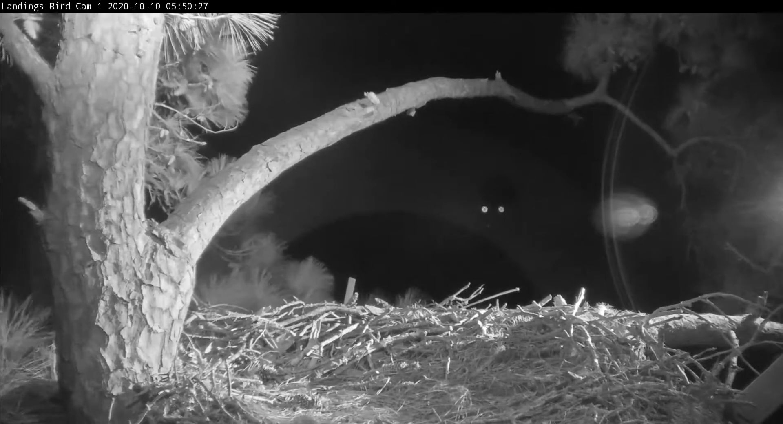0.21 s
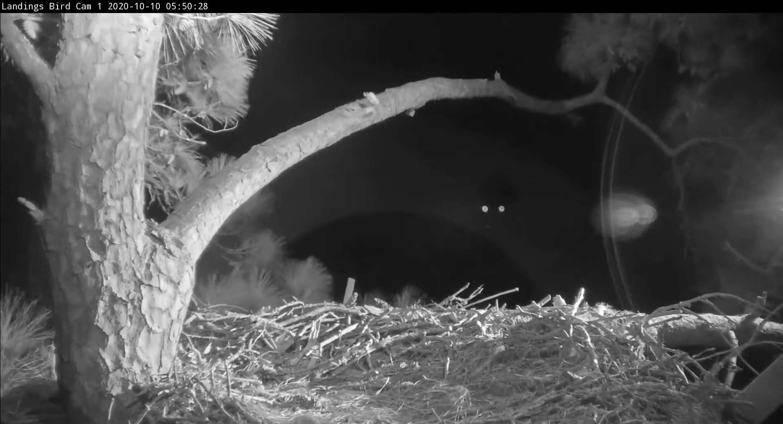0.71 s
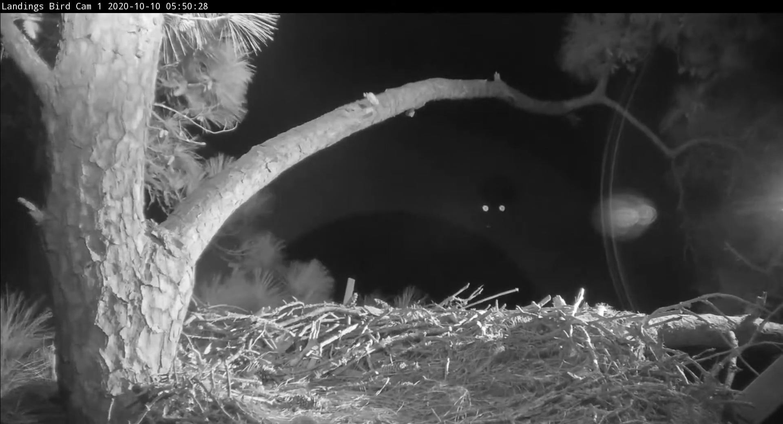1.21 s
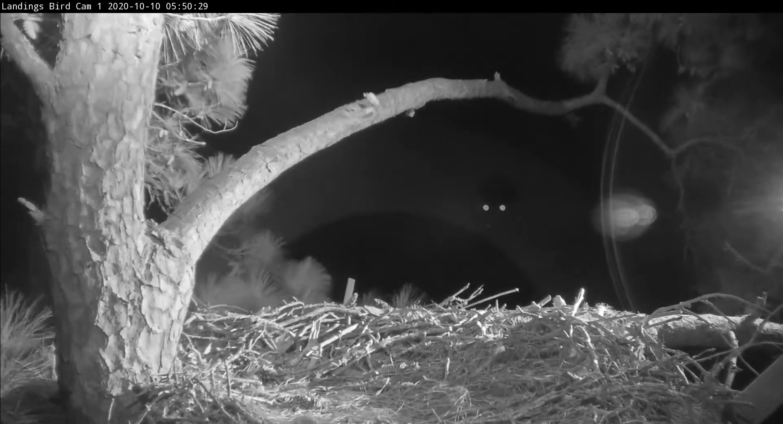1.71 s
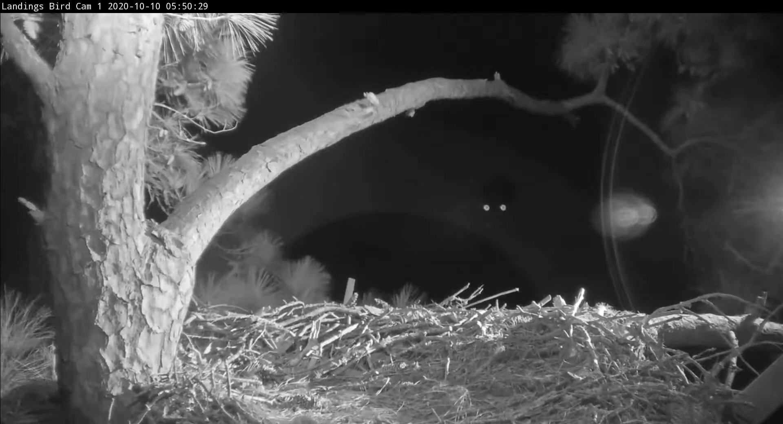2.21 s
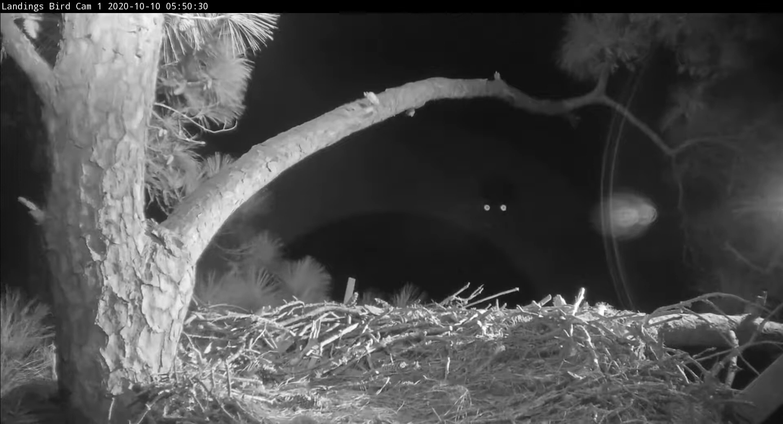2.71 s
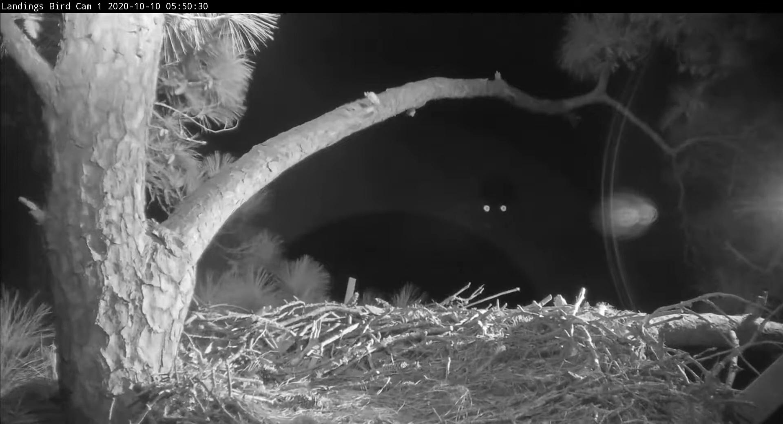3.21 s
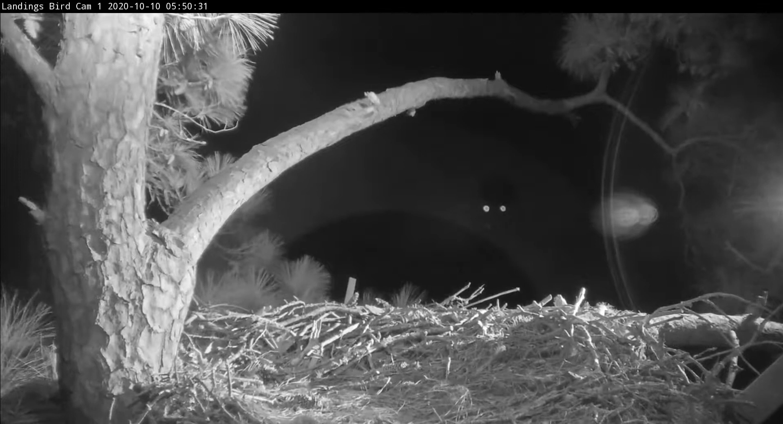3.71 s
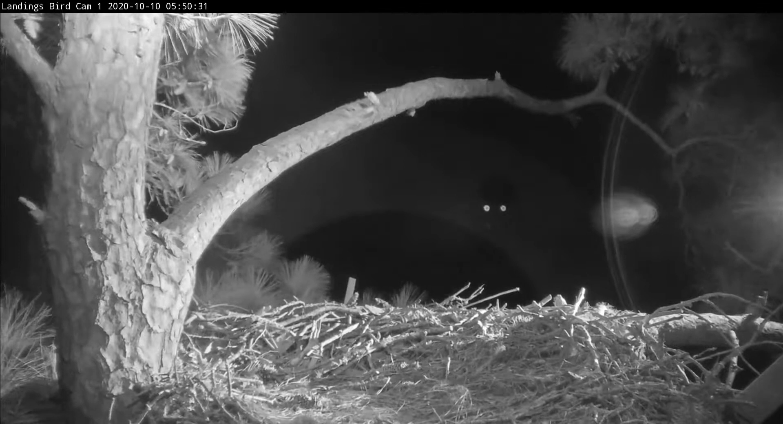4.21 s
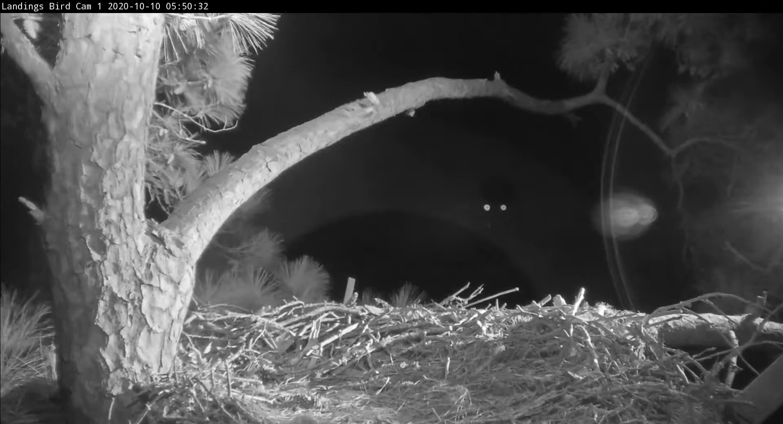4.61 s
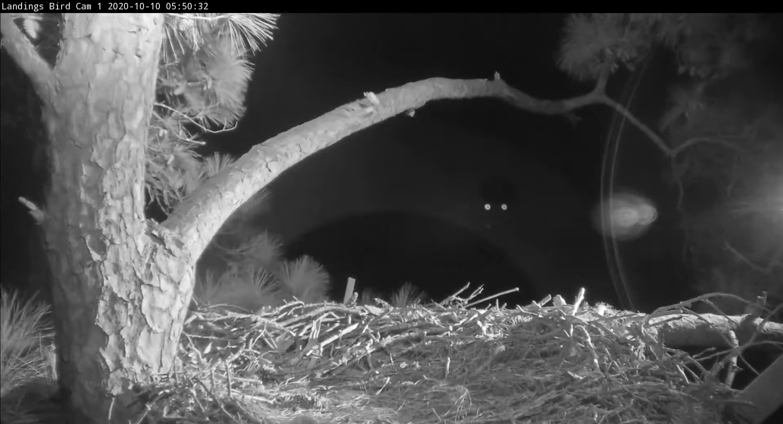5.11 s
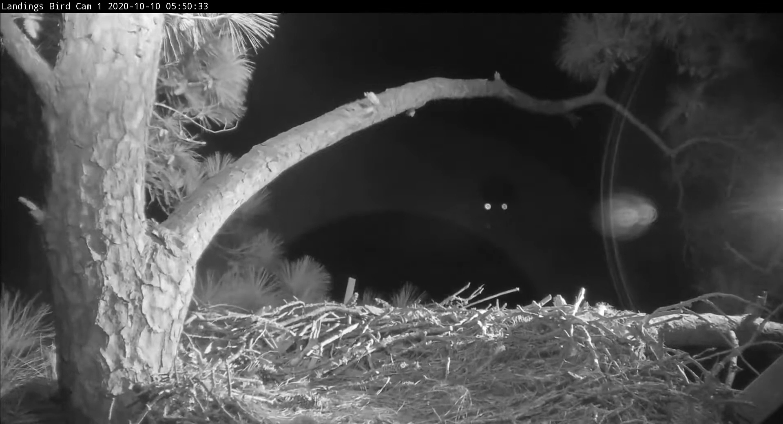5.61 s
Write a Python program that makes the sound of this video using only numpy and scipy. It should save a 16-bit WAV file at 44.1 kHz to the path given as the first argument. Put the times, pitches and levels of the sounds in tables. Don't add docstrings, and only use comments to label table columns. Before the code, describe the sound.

Crickets trill without pause over rumbling gusts and faint hum; an owl yelps at the very start and calls again, softly, five seconds later.

```python
import sys
import numpy as np
from scipy import signal
from scipy.fft import rfft, irfft, next_fast_len
from scipy.io import wavfile
from scipy.ndimage import uniform_filter1d

SR = 44100
rng = np.random.default_rng(int(sys.argv[2]) if len(sys.argv) > 2 else 0)


def to_wav(sig):
    pcm = np.clip(np.atleast_2d(sig), -1, 1) * 32767
    pcm = np.round(pcm).astype(np.int16)
    wavfile.write(sys.argv[1], SR, pcm.T)


def gain_from_decibels(decibels):
    exponent = np.asarray(decibels, float) / 20
    return 10 ** exponent


N = 257544

SQUAWK = [
    (0, 866, -22, .15, -3),
    (.003, 866, -29, .2, -2),
    (.005, 864, -26, .2, -1),
    (.009, 862, -32.5, .35, 0),
    (.014, 850, -36, .6, 1),
    (.019, 835, -35, .6, -1),
    (.023, 820, -55, .7, 0),
]
YELP = [
    (.016, 790, -40, .4, -2),
    (.022, 790, -29, .15, -3),
    (.026, 793, -18, .08, -5),
    (.032, 762, -22.5, .15, -6),
    (.036, 730, -28, .3, -6),
    (.040, 700, -24, .25, -8),
    (.046, 615, -31, .6, -12),
    (.060, 560, -35, .8, -17),
    (.085, 500, -50, .85, -18),
]
RISING_NOTE = [
    (4.965, 341.7, -61, 0.3, 7),
    (5.0, 406.4, -41.5, 0.17, -3),
    (5.025, 444.7, -46.5, 0.12, -2.5),
    (5.062, 463.4, -43.5, 0.01, -1),
    (5.12, 445.4, -49, 0.06, 1),
    (5.172, 448.3, -47.5, 0.03, 0.5),
    (5.215, 466, -43.5, 0.06, 1.5),
    (5.232, 496, -41.5, 0.03, -7),
    (5.242, 523, -84, 0.3, -7),
]
WHISTLE = [
    (5.222, 2597, -63, 0.79, 9),
    (5.233, 2640, -60, .8, 10),
    (5.247, 2690, -46.5, 0.1, 5),
    (5.27, 2605, -43, 0.6, -2.5),
    (5.287, 2600, -45.5, 0.49, 1.5),
    (5.305, 2500, -45.5, 0.58, 1.5),
    (5.333, 2480, -49, 0.55, 3),
    (5.352, 2440, -49.5, 0.89, 2),
    (5.39, 2400, -59, 0.97, -5),
]
CLOSING_NOTE = [
    (5.345, 385, -84, 0.23, -2),
    (5.364, 396, -61, .3, -4),
    (5.378, 387, -49, 0.12, -5.5),
    (5.393, 365, -66, .2, -6),
    (5.415, 370, -71, .3, -9),
]
PUFF = [
    (5.45, 648, -78, .7, -11),
    (5.47, 630, -42, 0.56, -16),
    (5.49, 660, -55, 0.54, -12),
    (5.51, 640, -69, .7, -6),
]
# [t/s, peak level/dB, f/Hz]
BEAK_CLACK = [
    (5.33, -47, 3400),
    (5.331, -52, 4600),
    (5.33, -53, 6000),
    (5.345, -48, 4850),
]
THIN_TONE = [
    (0.09, -48, 1310),
    (0.125, -49, 1320),
]

# [f/Hz, width/Hz, level/dB]
WINDPIPE = [(440, 60, 1), (915, 550, -9.5), (1330, 350, 2.5), (1760, 140, -12), (2245, 110, -8),
            (3150, 280, -2.5), (3994, 120, -2), (4470, 590, -15), (5340, 300, -14.5)]
WHISTLE_BEAK = [(1300, 1300, -7), (2620, 450, -1), (3300, 450, 4.5), (3740, 260, 4), (4270, 300, 3),
                (4700, 350, -2), (5250, 500, -3)]
OPEN_BEAK = [(860, 300, -12), (1780, 350, -14), (2590, 400, 2), (3480, 350, -4.5), (4250, 500, -16),
             (5130, 400, -9), (5900, 400, -21)]
YELP_BEAK = [(546, 290, -16.5), (1146, 250, -5), (1865, 240, 0), (2410, 620, -1.5), (2990, 450, 3),
             (4160, 480, -7), (4910, 500, -8.5), (5800, 800, -18)]
SHUT_BEAK = [(387, 270, -2), (780, 270, -8), (1180, 250, 7), (1600, 400, 0)]

# [t/s, level/dB]
CHORUS_SWELLS = [(0.08, -45.5), (0.37, -47), (1.43, -47), (2.12, -42.5), (2.21, -47.5), (2.39, -42.5),
                 (2.68, -45), (2.76, -41), (2.92, -43.5), (3.29, -41), (3.42, -44), (4.75, -43), (5.4, -47),
                 (5.57, -42.5), (5.6, -51.5), (5.65, -44.5), (5.74, -41), (5.84, -44.5)]
# [t/s, peak level/dB, f/Hz]
NEAR_STROKES = [(0.101, -36, 2950), (0.406, -35.5, 2960), (0.584, -33, 2960), (0.681, -35, 2890),
                (1.032, -32, 2940), (1.075, -33.5, 2990), (1.153, -35, 2890), (1.378, -35.5, 2970),
                (1.52, -36.5, 2980), (1.847, -37, 2970), (1.89, -36, 2910), (1.935, -34.5, 2900),
                (1.973, -34.5, 2950), (2.051, -32.5, 2990), (2.125, -31, 2930), (2.408, -35.5, 2860),
                (2.438, -34.5, 2910), (2.683, -36, 3030), (2.777, -34.5, 2960), (2.835, -33.5, 2950),
                (2.881, -38, 2860), (2.924, -37.5, 2970), (2.963, -34.5, 2980), (2.996, -34, 3020),
                (3.118, -33.5, 2880), (3.166, -32, 2990), (3.228, -43, 2960), (3.259, -30.5, 2930),
                (3.29, -33.5, 2890), (3.357, -33, 2940), (3.482, -33, 2940), (3.513, -34.5, 2910),
                (3.609, -34.5, 2980), (3.66, -33.5, 2920), (3.883, -38.5, 3030), (3.943, -35.5, 3020),
                (3.994, -33, 2960), (4.063, -35, 3060), (4.094, -33.5, 2870), (4.143, -35.5, 2960),
                (4.183, -35.5, 2990), (4.248, -33, 2950), (4.309, -34.5, 2900), (4.379, -34.5, 2930),
                (4.462, -33, 2890), (4.53, -33.5, 3020), (4.62, -31.5, 2940), (4.681, -36, 3050),
                (4.736, -32, 2930), (4.8, -31, 2970), (4.832, -34, 2990), (4.883, -32, 2940),
                (4.95, -35, 2870), (5.05, -43, 2900), (5.124, -34, 2920), (5.223, -32.5, 2940),
                (5.477, -36.5, 2990), (5.657, -35, 2950), (5.759, -32.5, 3000), (5.79, -36, 2940)]
# [onset t/s, peak level/dB, f/Hz]
MORE_STROKES = [(0.2692, -35, 2990), (0.3376, -35.5, 2840), (0.3865, -35, 2940), (0.5077, -36.5, 2890),
                (0.6225, -39.5, 2950), (0.8086, -35.5, 2920), (0.856, -34.5, 2920), (0.8889, -35, 2930),
                (0.9742, -38, 2910), (1.1104, -34.5, 2910), (1.2231, -38, 2910), (1.2447, -34, 2890),
                (1.275, -33, 2930), (1.3119, -36, 2990), (1.3324, -41, 2970), (1.4551, -37, 2880),
                (1.5384, -37.5, 3060), (1.5702, -37, 3050), (1.5851, -34.5, 2980), (1.729, -37, 2980),
                (1.9574, -34, 2910), (2.0228, -37, 3000), (2.1031, -36, 2840), (2.1983, -36, 2930),
                (2.2633, -35.5, 2940), (2.3476, -39, 2960), (2.3625, -34, 2900), (2.592, -38.5, 2970),
                (2.6339, -36, 2880), (2.7026, -35, 2980), (2.7384, -33, 2990), (3.306, -32, 2990),
                (3.334, -32, 2840), (3.39, -39, 3080), (3.45, -34, 2950), (3.5359, -38, 2900),
                (3.5644, -37, 3040), (3.5848, -33.5, 2910), (3.7738, -36, 2890), (3.9599, -35, 2930),
                (4.28, -37, 2860), (4.334, -40, 2890), (4.354, -36, 3030), (4.4044, -34, 2930),
                (4.432, -32.5, 2910), (4.575, -39, 2980), (4.6374, -33, 2950), (4.706, -33, 2970),
                (4.757, -32.5, 2930), (4.8604, -34, 2940), (4.9172, -34, 3010), (5.0305, -40, 2880),
                (5.406, -35.5, 3060), (5.4331, -33.5, 2940), (5.5333, -33.5, 2920), (5.6341, -33.5, 2980),
                (5.6915, -34, 2850), (5.723, -34, 2960), (5.8262, -37, 2950)]

# [f/Hz, level/(dB per Hz)]
AIR = [(60, -26), (150, 0), (400, -6.5), (680, -12.5), (1000, -5.5), (1190, 2.5), (1420, -2), (1900, -4),
       (2500, -9), (3400, -4.5), (4300, -10), (5200, -17.5), (6000, -10), (6700, -10.5), (7200, -28.5)]
# [t/s, gain/dB]
GAIN = [(0, -3), (0.5, -4), (1.0, -5), (1.45, -3), (2.05, 0.5), (2.25, -3), (2.6, -1), (3.2, 0), (3.9, 1),
        (4.3, -1), (4.9, 1), (5.1, -3), (5.55, -1.5), (5.84, 1.5)]

# [t/s, level/dB]
GUSTS = [(0.0, -35.5), (0.4, -38.5), (0.6, -36.5), (0.78, -30.5), (1.0, -39.5), (1.36, -33), (1.42, -51),
         (1.7, -44), (1.85, -46), (2.1, -48), (2.22, -39.5), (2.55, -40.5), (2.7, -48.5), (3.75, -48),
         (3.95, -49.5), (4.15, -42), (5.3, -54.5), (5.84, -44.5)]
# [f/Hz, level/(dB per Hz)]
RUMBLE = [(18, -75.5), (30, -46.5), (67, -15), (129, 2), (150, 7), (298, -7), (449, -17), (678, -33),
          (800, -38.5), (1040, -63.5), (1760, -120)]
SPRAY = [(90, -14), (140, 4.5), (250, 4), (400, -8.5), (600, -18), (900, -29.5)]
RUSTLE = [(500, -24), (800, -10.5), (1200, -1.5), (1800, -8), (2600, -16.5)]
# [t/s, peak level/dB,
# f/Hz]
BUFFETS = [(0.022, -36, 166), (0.048, -36.5, 236), (0.085, -33, 186), (0.122, -33.5, 196),
           (0.16, -31.5, 216), (0.251, -35, 176), (0.279, -34, 152), (0.323, -37.5, 212), (0.344, -30, 159),
           (0.38, -32.5, 210), (0.405, -32.5, 176), (0.439, -36, 181), (0.469, -35, 237), (0.501, -35, 195),
           (0.529, -41, 249), (0.572, -38.5, 169), (0.602, -35.5, 212), (0.634, -36, 186),
           (0.661, -37, 171), (0.704, -31.5, 167), (0.73, -34.5, 211), (0.77, -29.5, 188),
           (0.804, -30.5, 212), (0.824, -33, 207), (0.871, -33, 159), (0.918, -35.5, 190),
           (0.955, -33, 174), (0.99, -41, 198), (1.028, -38, 188), (1.079, -36, 141), (1.104, -32.5, 205),
           (1.169, -37.5, 200), (1.216, -38, 182), (1.246, -33, 182), (1.278, -30, 183), (1.306, -33, 184),
           (1.341, -30, 213), (1.391, -29, 179), (1.424, -41, 173), (1.496, -36, 174), (1.515, -36, 153),
           (1.553, -40, 149), (1.585, -34, 174), (1.676, -33, 217), (1.709, -39, 161), (1.74, -36.5, 156),
           (1.782, -39.5, 187), (2.028, -45, 143), (2.092, -42, 138), (2.117, -39.5, 163),
           (2.177, -30, 162), (2.198, -31, 208), (2.302, -32.5, 183), (2.35, -32, 163), (2.392, -34.5, 176),
           (2.459, -34.5, 164), (2.502, -37, 171), (2.533, -33, 158.5), (2.552, -33, 198),
           (2.648, -41, 180),
           (2.931, -42, 235), (3.012, -38.5, 202), (3.069, -43, 189), (3.136, -53, 193),
                (3.276, -39, 193), (3.654, -41, 205), (3.683, -43, 193), (3.778, -35, 176),
                (4.131, -35, 190), (4.166, -35.5, 187), (4.24, -37.5, 184), (4.302, -41.5, 186),
                (4.398, -47, 209), (4.429, -46, 203), (4.494, -47, 199), (4.72, -43.5, 185),
                (4.775, -37.5, 183), (4.84, -43.5, 210), (4.973, -36.5, 194), (5.782, -40.5, 240)]
# [onset t/s, peak level/dB, f/Hz]
SNAPS = [(0.105, -42, 301), (0.16, -47, 301), (0.245, -48, 347), (0.326, -46, 390), (0.465, -42, 301),
         (0.683, -40, 320), (0.725, -38, 328), (0.813, -38, 301), (0.946, -46, 366), (1.049, -46, 369),
         (1.098, -48, 326), (1.275, -48, 301), (1.372, -38, 298), (2.188, -46, 301), (2.282, -45, 347),
         (2.548, -46, 320)]

# [f/Hz, level/dB, wander/Hz]
WHINES = [(180, -57, 2), (470, -71, 2), (821.2, -65.5, .6), (1186, -61.5, 44.3), (2345, -70, .8)]

EDGE_HZ = 7400
CHORUS_DB, CHORUS_EVEN = -0.14, 0.18
THROB_DB, THROB_PER_S = .4, 25
STROKE_S, STROKE_DB, STROKE_HUSH = 0.0034, -1.5, 0.75
AIR_DB, AIR_FOLLOWS = -48.5, 0.84
LEVELLED, LEVEL_S = 0.3, 0.053
BUFFET_S, BUFFET_DB, BUFFET_HUSH = 0.0088, -3.5, 0.57
SNAP_S, SNAP_DB = 0.003, -2.5
HUM_HZ, HUM_DB = 120.6, -48
MOTOR_DB, BEAT_PER_S, BEAT_NULL_S = -5, 2.638, 3.715


def evened(x):
    return x / np.sqrt(np.mean(x ** 2) + 1e-20)


def column(rows, k, t):
    rows = np.array(rows)
    return np.interp(t, rows[:, 0], rows[:, k])


def drift(per_s, size=N):
    fast = next_fast_len(size)
    spectrum = rfft(rng.standard_normal(fast))
    lowpass = 1 + (np.fft.rfftfreq(fast, 1 / SR) / per_s) ** 2
    return evened(irfft(spectrum / lowpass, fast)[:size])


def noise(spectrum, patchy_db, size=1024):
    hop, hz = size // 4, np.fft.rfftfreq(size, 1 / SR)
    real, imag, patches = rng.standard_normal((N // hop + 5, size // 2 + 1, 3)).T
    patches = uniform_filter1d(patches, size=12, axis=0)
    patches = evened(uniform_filter1d(patches, size=10, axis=1))
    f, db = np.transpose(spectrum)
    shape_db = np.interp(np.log(hz + 1), np.log(f), db, left=-90, right=-90)
    z = (real + 1j * imag) * gain_from_decibels(shape_db[:, None] + patchy_db * patches)
    return evened(signal.istft(z, nperseg=size, noverlap=size - hop)[1][:N])


def bursts(rows, half_s, sag, overtone):
    u = np.arange(-1500, 1500) / SR
    bell = np.exp(-(u / half_s) ** 2 / 2)
    out, cover = np.zeros(N + 3000), np.zeros(N + 3000)
    for (s, db, hz), phase in zip(rows, rng.random((len(rows), 2))):
        turns = hz * u * (1 - sag * u)
        tone = np.sin(2 * np.pi * (turns + phase[0]))
        tone += overtone * bell * np.sin(2 * np.pi * (1.78 * turns + phase[1]))
        at = round(s * SR)
        out[at:at + 3000] += gain_from_decibels(db) * bell * tone
        cover[at:at + 3000] += bell
    return out[1500:N + 1500], np.minimum(cover[1500:N + 1500], 1)


def peaks(modes, hz):
    return np.sqrt(sum(gain_from_decibels(2 * db) / (1 + (2 * (hz - f) / w) ** 2) ** 2 for f, w, db in modes))


def breath(turns, throat, bright_db, ragged_db):
    size = len(turns)
    puffs = (.3 + np.exp(-(turns % 1) / .4)) * rng.standard_normal(size)
    puffs *= gain_from_decibels(1.5 * drift(500, size)) * gain_from_decibels(ragged_db * drift(70, size))
    bins = np.fft.rfftfreq(size, 1 / SR)
    puffs = rfft(puffs) * peaks(throat, bins)
    high = 1 / (1 + (2300 / (bins + 1)) ** 4)
    low, top = irfft(puffs * (1 - high), size), irfft(puffs * high, size)
    return (low + gain_from_decibels(1.3 * bright_db) * top) / irfft(puffs, size).std()


def owl(rows, throat, jitter, ragged_db=2.0):
    t = np.arange(rows[0][0], rows[-1][0], 1 / SR)
    size = len(t)
    hz = column(rows, 1, t) * (1 + jitter * drift(130, size))
    rough, bright_db = np.clip(column(rows, 3, t), 0, 1), column(rows, 4, t)
    turns = np.cumsum(hz) / SR
    clear = 0
    for k in range(1, 17):
        octaves = np.maximum(np.log2(k * hz / 1500), 0)
        tilt = gain_from_decibels((bright_db + .5 * ragged_db * drift(45, size)) * octaves)
        partial = np.cos(2 * np.pi * (k * turns + rng.random()))
        clear += peaks(throat, k * hz) * tilt * partial * (k * hz < EDGE_HZ)
    air = breath(turns, throat, bright_db, ragged_db)
    voice = np.sqrt(2 * (1 - rough)) * clear + 1.5 * np.sqrt(rough) * air
    out, at = np.zeros(N), round(rows[0][0] * SR)
    out[at:at + size] = voice * gain_from_decibels(column(rows, 2, t))
    return out


def owl_calls():
    first = owl(SQUAWK, OPEN_BEAK, 0.0097, ragged_db=-0.5) + owl(YELP, YELP_BEAK, 0.006, ragged_db=0.5)
    second = owl(RISING_NOTE, WINDPIPE, 0.00056)
    second += owl(WHISTLE, WHISTLE_BEAK, 0.014, ragged_db=2.2)
    second += bursts(BEAK_CLACK, 0.0024, 1.5, 0)[0]
    second += owl(CLOSING_NOTE, SHUT_BEAK, 0.0043)
    second += owl(PUFF, np.multiply(YELP_BEAK, [.8, 1, 1]), 0.0058)
    return first + second


def leaves(x, t60, wet_db):
    size = SR // 2
    sparse = rng.standard_normal(size) * (rng.random(size) < .05)
    taps = sparse * gain_from_decibels(-60 * np.arange(size) / SR / t60)
    return x + gain_from_decibels(wet_db) * signal.fftconvolve(x, taps / np.linalg.norm(taps))[:N]


def crickets(count=24):
    t, out = np.arange(N) / SR, np.zeros(N)
    for place, (pace, start) in zip(np.linspace(-1, 1, count), rng.random((count, 2))):
        strokes = np.cumsum((45 + 30 * pace) * (1 + .08 * drift(4))) / SR + start
        part = strokes % 1
        hz = 2940 + 105 * place + 25 * drift(5) - 120 * (part - .35)
        restart = rng.random(int(strokes[-1]) + 1)[strokes.astype(int)]
        wing = np.sin(np.pi * np.minimum(part / 0.5, 1)) ** 2
        level = gain_from_decibels(-15 * place ** 2 + 0.44 * drift(15))
        out += level * wing * np.sin(2 * np.pi * (np.cumsum(hz) / SR + restart))
    out = evened(out)
    out = out / (abs(uniform_filter1d(out ** 2, size=400)) + 0.11) ** (CHORUS_EVEN / 2)
    chorus = gain_from_decibels(CHORUS_DB + column(CHORUS_SWELLS, 1, t) + THROB_DB * drift(THROB_PER_S)) * evened(out)
    second = np.add(MORE_STROKES, [.003, -1.5, 0])
    near, cover = bursts(np.vstack([NEAR_STROKES, second]), STROKE_S, 1.8, 0)
    return chorus * (1 - STROKE_HUSH * cover) + gain_from_decibels(STROKE_DB) * near


def wind():
    gust_db = column(GUSTS, 1, np.arange(N) / SR)
    hits = np.array(BUFFETS) * [1, 1, .93]
    pushes, cover = bursts(hits, BUFFET_S, 7.6, 0.28)
    low = noise(RUMBLE, 0.69, size=4096)
    low = low / (abs(uniform_filter1d(low ** 2, round(LEVEL_S * SR))) + .05) ** (LEVELLED / 2)
    rumble = gain_from_decibels(gust_db - 6.0) * (1 - BUFFET_HUSH * cover) * evened(low * gain_from_decibels(1.9 * drift(15)))
    push_envelope = abs(signal.hilbert(pushes, next_fast_len(N))[:N])
    spray = gain_from_decibels(-11.0) * push_envelope * noise(SPRAY, 1.8)
    snaps = gain_from_decibels(SNAP_DB) * bursts(np.add(SNAPS, [SNAP_S, 0, 0]), SNAP_S, 6.0, .4)[0]
    stir_db = .7 * (gust_db + 40)
    rustle = gain_from_decibels(stir_db - 58 + 2.0 * drift(41)) * noise(RUSTLE, 3.0)
    return rumble + snaps + gain_from_decibels(BUFFET_DB) * pushes + spray + rustle


def night_air():
    gain_db = column(GAIN, 1, np.arange(N) / SR)
    return gain_from_decibels(AIR_DB + AIR_FOLLOWS * gain_db + 0.87 * drift(37)) * noise(AIR, 1.15)


def hum():
    t = np.arange(N) / SR
    turn = 2 * np.pi * np.cumsum(HUM_HZ + 0.041 * drift(3.8)) / SR
    slip = 2 * np.pi * BEAT_PER_S * (t - BEAT_NULL_S)
    out = gain_from_decibels(HUM_DB) * (np.sin(turn) - gain_from_decibels(MOTOR_DB) * np.sin(turn - slip))
    for hz, db, wander in WHINES:
        whine = np.sin(2 * np.pi * np.cumsum(hz + wander * drift(4 + wander)) / SR)
        out += gain_from_decibels(db + 2.2 * drift(2)) * whine
    return np.sqrt(2) * gain_from_decibels(column(GAIN, 1, t) - 3.5) * out


def scene():
    bird = leaves(owl_calls(), 0.21, -23.0) + bursts(THIN_TONE, .014, 0, 0)[0]
    return (bird + crickets() + wind() + night_air() + hum())[None]


def band_limit(x):
    return signal.sosfilt(signal.butter(12, 8150, fs=SR, output="sos"), x)


def record(dry):
    lowpass = signal.firwin(255, EDGE_HZ, window=("kaiser", 9), fs=SR)
    band = signal.oaconvolve(dry, lowpass[None], "same")
    band = signal.sosfilt(signal.butter(5, 66, "high", fs=SR, output="sos"), band)
    mix = band + gain_from_decibels(-100) * rng.standard_normal(dry.shape)
    return band_limit(mix)


dry = scene()
out = record(dry)
to_wav(out)
```